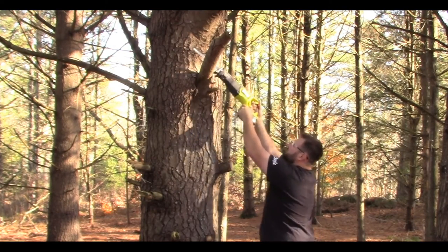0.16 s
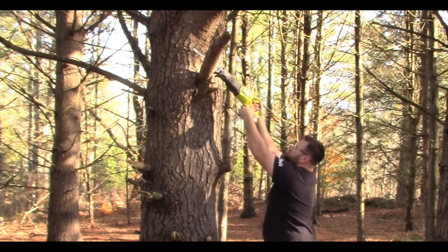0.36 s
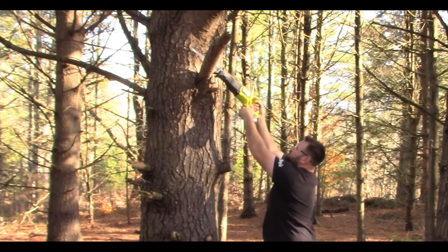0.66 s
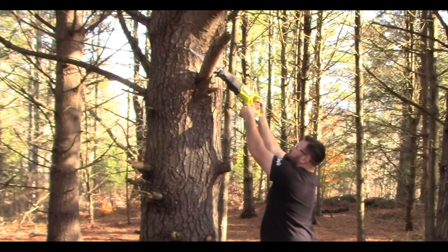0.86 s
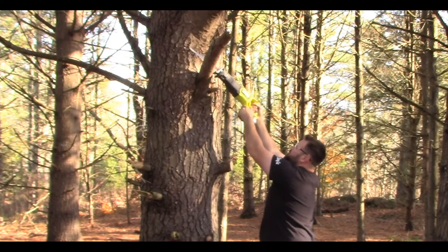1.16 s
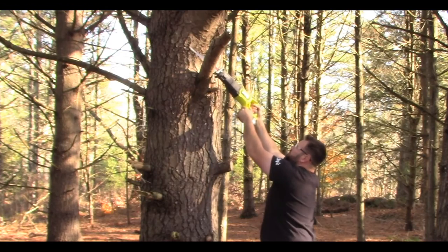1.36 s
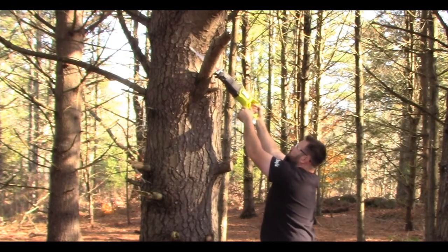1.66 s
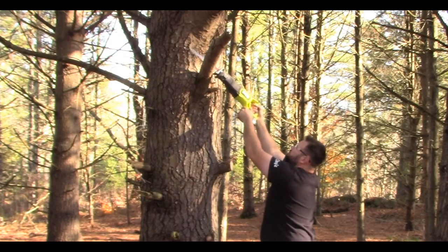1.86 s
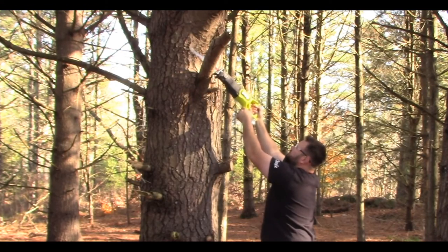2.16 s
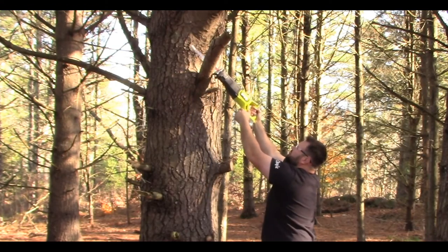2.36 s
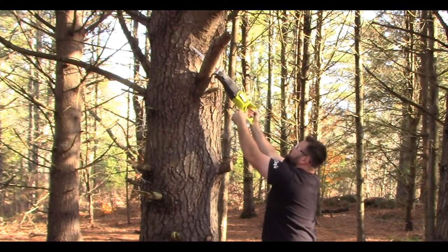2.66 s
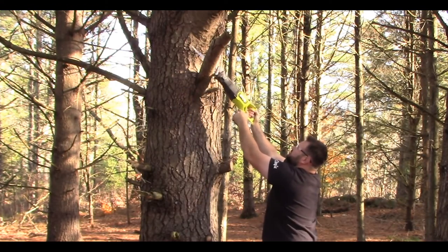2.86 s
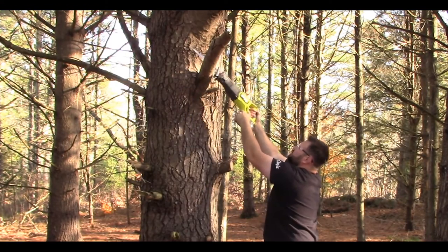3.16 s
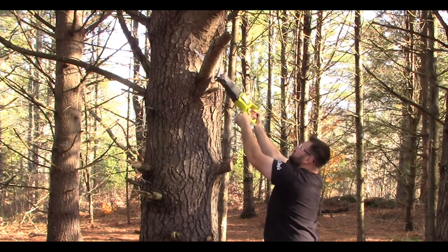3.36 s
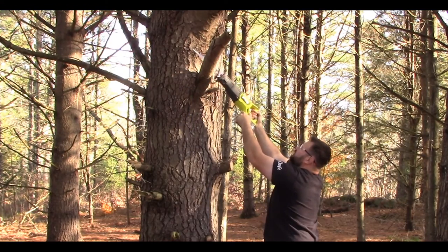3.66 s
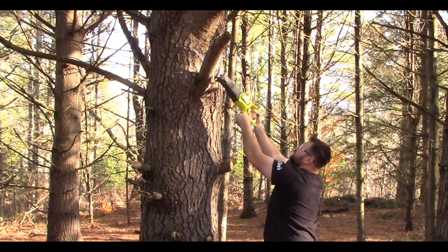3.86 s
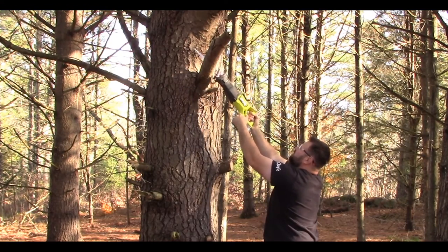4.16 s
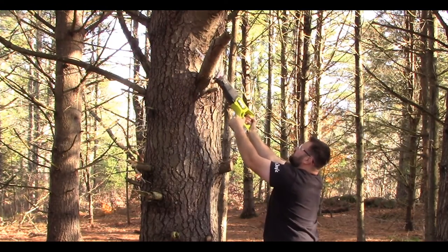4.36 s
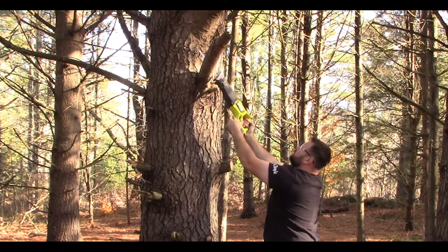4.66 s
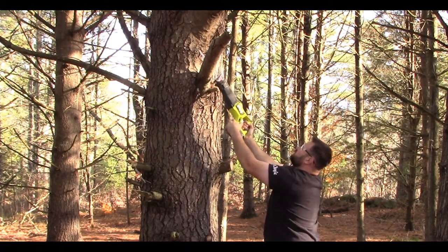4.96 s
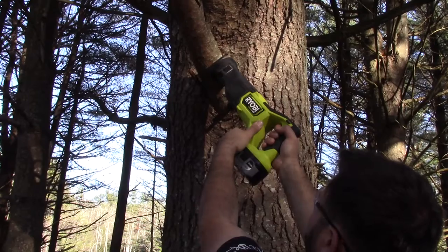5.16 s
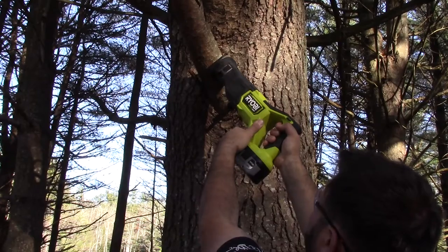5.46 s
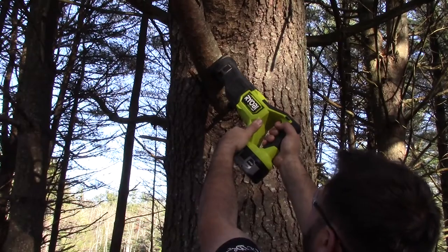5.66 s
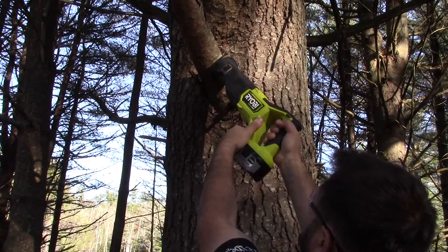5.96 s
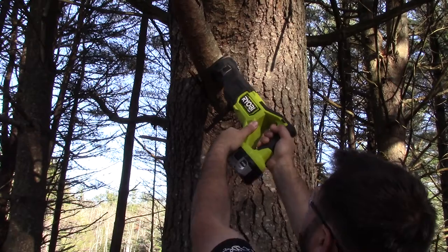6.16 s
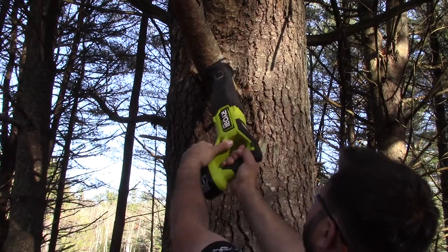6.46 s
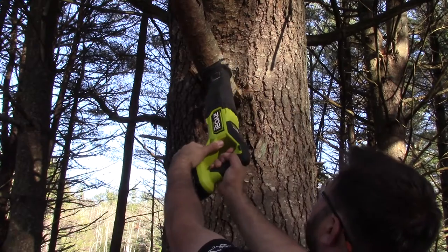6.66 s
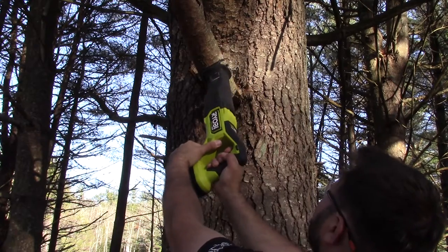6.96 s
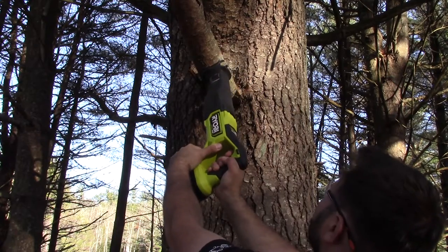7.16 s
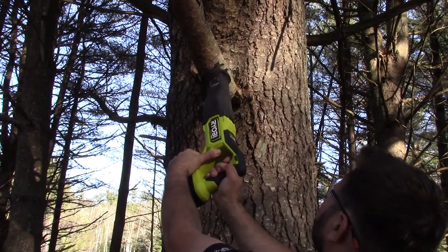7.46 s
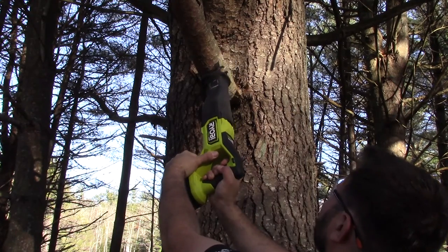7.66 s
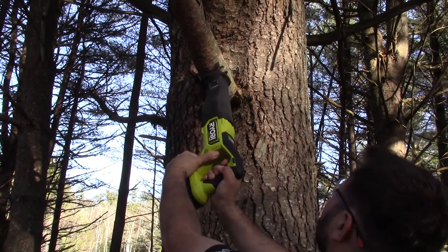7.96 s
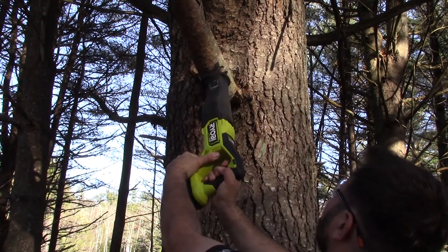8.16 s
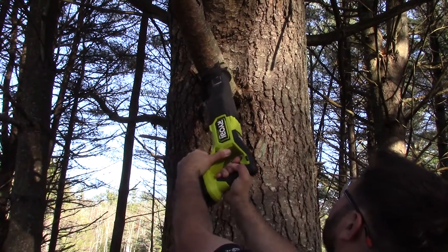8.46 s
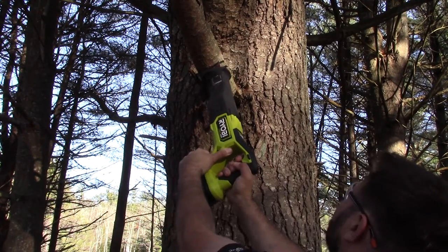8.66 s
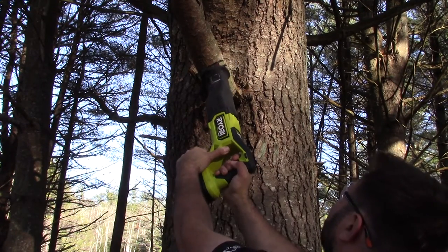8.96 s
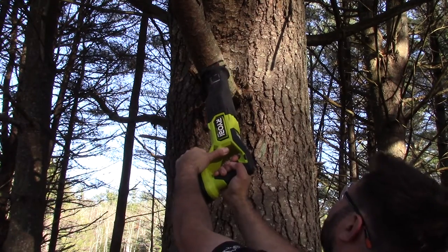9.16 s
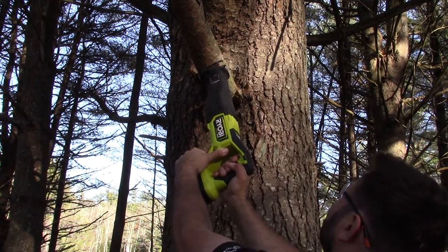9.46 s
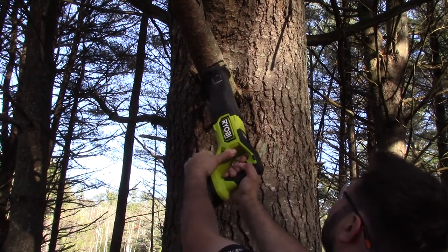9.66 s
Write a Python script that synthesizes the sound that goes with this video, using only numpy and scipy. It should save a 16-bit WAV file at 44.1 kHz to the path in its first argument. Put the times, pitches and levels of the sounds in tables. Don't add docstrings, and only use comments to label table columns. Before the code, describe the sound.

From 0 to 0.45 s there is only soft, still woodland air and the low, faint hum of a far engine. At about 0.46 s a battery reciprocating saw is triggered: a thin electric whirr climbs for a quarter second, and by 0.7 s the teeth bite. A loud, hard, fast rattle follows, over forty strokes a second, knocking and ringing in the housing, with a gear whine and bright dry rasp of torn wood fibres. The pitch lifts slightly toward 2.6 s, then sags near 2.8-3 s as the blade is pushed harder. The first part is heard from farther off; at 5.05 s it cuts suddenly to a close perspective. Around 6.3 s the saw leans in and labours lower, its tone shifting again near 7.35 and 8.4 s with small pitch wavers. It keeps sawing to the end, outdoors with only short trunk reflections.

```python
import sys
import numpy as np
from scipy import signal
from scipy.io import wavfile
from scipy.ndimage import uniform_filter1d, minimum_filter1d

SR = 44100
rng = np.random.default_rng(int(sys.argv[2]) if len(sys.argv) > 2 else 0)


def amplitude_ratio(level_db):
    exponent = np.asarray(level_db, float) / 20
    return 10 ** exponent


def to_wav(s):
    ch = np.atleast_2d(s).T
    pcm = np.round(np.clip(ch, -1, 1) * 32767)
    wavfile.write(sys.argv[1], SR, pcm.astype(np.int16))


N = 432180
t = np.arange(N) / SR

PINION, WHEEL = 6, 44
TRIGGER_S, SPIN_S = .462, .26
BITE_S, BITE_SPAN_S = 0.676, 0.064

# start_s (middle of the turn), span_s
RASP_TURNS = [
    (2.3, 0.36),
    (2.82, 0.31),
    (4.2, 0.44),
    (5.045, .01),
    (6.3, 0.24),
    (7.35, 0.46),
    (8.4, 0.22),
]
# housing_db, rasp_db, whine_gain_db, handle_shake_db
STANCE = [(-15.5, -30.5, -0.5, -31.5), (-15.5, -31, -1, -37), (-13.8, -30, -0.5, -34),
          (-13.5, -29, 0.3, -42), (-11.5, -31, 0.8, -30), (-13.5, -30.5, -7.5, -34), (-14, -29, 0.1, -33),
          (-12.5, -29.5, -4.5, -34)]
# knock_db (against the housing), rattle_lock (0-1), clamp_tick_share,
# trunk_echo_ms
PLAY = [(-7, 0.83, .22, 1.29), (-9, 0.49, .22, 1.21), (-4, .82, 0.34, 1.24), (-3, 0.73, 0.51, 1.28),
        (-4, 0.85, .25, 0.97), (-4.5, 0.81, 0.42, 0.844), (-5.5, 0.83, .5, 0.895), (-3.8, 0.78, 0.48, .8)]


def housing(stroke, still):
    # pitch_hz, width_hz, level_db
    knock_modes = [(1490, 230, 0), (1690, 200, -6), (660, 130, -19)]
    # pitch_hz, level_db (per Hz)
    shell_start = [(30, -56), (60, -20), (110, -25.5), (200, -25), (290, -24), (430, -10), (520, -9),
                   (660, -8), (880, -4), (1150, -4), (1450, -3.5), (1680, 5), (1900, -15), (2200, -14.5),
                   (2600, -27), (3600, -96)]
    shell_push = [(30, -42), (60, -19), (110, -32.5), (200, -25.5), (290, -22), (430, -5.5), (520, -10),
                  (660, -6.5), (880, -6.5), (1150, -7), (1450, -0.5), (1680, 4.5), (1900, -25.5),
                  (2200, -15), (2600, -23), (3600, -62)]
    shell_near = [(30, -62), (60, -21), (110, -29), (200, -28.5), (290, -28.5), (430, -5), (520, -14),
                  (660, -4.5), (880, -12), (1150, -8.5), (1450, 2), (1680, 2), (1900, -28), (2200, -14),
                  (2600, -24), (3600, -74)]
    shell_deep = [(30, -68), (60, -25), (110, -26), (200, -27.5), (290, -26.5), (430, -8), (520, -14.5),
                  (660, -2.5), (880, -5.5), (1150, -5.5), (1450, 3), (1680, 1), (1900, -30), (2200, -13.5),
                  (2600, -17), (3600, -43)]
    shell_last = [(30, -59), (60, -28), (110, -29.5), (200, -28.5), (290, -29), (430, -8.5), (520, -16.5),
                  (660, -8), (880, -10), (1150, -4), (1450, -6), (1680, 4), (1900, -21), (2200, -18),
                  (2600, -18.5), (3600, -77)]
    # start_s (middle of the turn), span_s
    hold_turns = [
        (2.8, 0.25),
        (5.045, .01),
        (6.3, 0.32),
        (8.4, 0.18),
    ]

    knock = amplitude_ratio(np.minimum(stance(PLAY, column=0), -1) - 14 * still)
    lock = np.clip(stance(PLAY, column=1), 0, 1)
    hits = blows(stroke, slack_s=.00018, spread_db=2.3)

    ring_s = t[:1500]
    case = np.zeros(1500)
    for hz, width_hz, db in knock_modes:
        case += amplitude_ratio(db) * np.exp(-np.pi * width_hz * ring_s) * np.sin(2 * np.pi * hz * ring_s)
    case *= 1 - np.exp(-ring_s / 0.002)
    case = lowpass(case, 1800)
    knocks = evened(signal.oaconvolve(hits, case)[:N])

    shudder = fading(hits, 0.0014)
    throb_db = 2.4 * np.cos(2 * np.pi * (2 * stroke - .55)) + 1.2 * np.cos(2 * np.pi * (stroke - .25))
    throb = amplitude_ratio(throb_db)
    loose = evened(rng.standard_normal(N) * (1 + 0.28 * evened(shudder)) * throb)
    drive = .33 * lock * locked_rattle(stroke, throb) + np.sqrt(1 - lock ** 2) * loose
    shell = facing(drive, [shell_start, shell_push, shell_near, shell_deep, shell_last], hold_turns)

    slow = np.minimum(2 * still, .8)
    shell = 1.9 * slow * bandpass(loose, 3, (380, 1900)) + (1 - slow) * shell
    level_db = stance(STANCE, column=0) - 26 * still + 1.06 + .5 * drift(hz=2.5)
    return amplitude_ratio(level_db) * (knock * knocks + np.sqrt(1 - knock ** 2) * evened(shell))


def blows(stroke, slack_s, spread_db):
    knock_places = [(.22, 4.2), (.7, 0)]
    out = np.zeros(N)
    for place, db in knock_places:
        at = np.flatnonzero(np.diff(np.floor(stroke - place)))
        late, size = np.clip(rng.standard_normal((600, 2))[:len(at)].T, -2, 1.6)
        at = np.clip(at + (late * slack_s * SR).astype(int), 0, N - 1)
        out[at] += amplitude_ratio(db + spread_db * size)
    return out


def locked_rattle(stroke, throb):
    step = 6
    coarse, coarse_throb = stroke[::step], throb[::step]
    grip = ramp(2.9, .3)[::step]
    out = np.zeros(len(coarse))
    for k in range(2, 60):
        limb_db = grip * (6.5 * (k in (15, 17)) - 2 * (k in (14, 16)))
        limb_db = limb_db + 2 * (2 < k < 9) + 2 * (12 < k < 22)
        swell_db = 1.9 * drift(.8, step) - .2 * k
        out += tone(k * coarse, limb_db + swell_db) * (coarse_throb if k > 23 else 1)
    return evened(signal.resample_poly(out, step, 1)[:N])


def rasp(rotor, stroke, still):
    # pitch_hz, level_db (per Hz)
    rasp_start = [(1590, -20), (2700, -5), (2780, -6), (2950, -15), (3340, -4), (4680, -14), (5070, -10),
                  (7650, -7.5), (9120, -9), (12000, -21.5), (14400, -20), (15600, -34)]
    rasp_lift = [(1590, -29), (2700, -5), (2950, -8), (3760, -2.5), (4510, -12), (5460, -6), (6560, -6),
                 (8410, -2.5), (10300, -13), (11400, -11), (13700, -15), (15600, -25)]
    rasp_bite = [(1590, -40), (2700, -3.5), (3700, 1.5), (4070, -4.5), (4280, -9), (4750, 0), (6600, -4),
                 (8540, -0.5), (10600, -10.5), (11900, -6), (13300, -10), (15600, -21)]
    rasp_push = [(1590, -38), (2700, -5), (3150, -4), (3360, -7), (3650, -0.5), (4190, -4.5), (4680, -4.5),
                 (6090, -4.5), (7320, 0), (8290, -10), (11000, -10.5), (15600, -23)]
    rasp_near = [(1590, -34), (2700, -7), (3780, 2.5), (4190, -6), (4710, -8.5), (5030, -9), (5380, -5),
                 (6090, -5), (6320, -9), (7160, -7.5), (7590, -8), (11300, -13), (12300, -12), (14400, -14),
                 (15600, -26)]
    rasp_lean = [(1590, -38), (2700, -6), (3700, -0.5), (4350, -5), (4610, -5), (5500, -4), (6370, -11),
                 (6950, -10), (7760, -12.5), (9460, -10.5), (11800, -8.5), (14200, -14), (15600, -29)]
    rasp_deep = [(1590, -29), (2700, -5), (3040, -9), (3810, 0), (4350, -8), (4510, -4.5), (5300, -1),
                 (6370, -10), (6850, -7), (8730, -9), (11400, -9), (12000, -7.5), (15600, -26)]
    rasp_last = [(1590, -27), (2700, -1.5), (3130, -3.5), (3390, -1), (4250, -4), (4710, -1.5),
                 (5870, -3.5), (7320, -4.5), (7590, -4.5), (9180, -9), (11900, -7), (13800, -10),
                 (15600, -28)]
    # order, far_db, near_db (against the rasp)
    orders_up = [(12, -29, -30), (16, -20, -18), (18, -25, -20), (20, -24, -24), (24, -20.5, -23),
                 (28, -29, -30), (32, -27, -21), (40, -24, -14)]

    pull_db = 1.4 * np.cos(2 * np.pi * (2 * stroke - .5)) + 1.54 * np.cos(2 * np.pi * (stroke - .7))
    tearing = rng.standard_normal(N)
    snap_now = rng.random(N) < 1500 / SR
    snaps = amplitude_ratio(3.2 * np.minimum(rng.exponential(1, N), 4)) * snap_now * rng.standard_normal(N)
    fibres = amplitude_ratio(pull_db + 0.22 * drift(hz=58.7)) * (tearing + 0.61 * evened(snaps))

    ticks = fading(blows(stroke, slack_s=.0005, spread_db=3.5), .0012) * rng.standard_normal(N)
    ticks = 0.4 * ticks + bandpass(ticks, 2, (10000, 12500))
    drive = trunk(fibres + stance(PLAY, column=2) * evened(ticks))
    drive = drive + orders(rotor, stroke, orders_up, 9 * np.minimum(3 * still, 1))

    colours = [rasp_start, rasp_lift, rasp_bite, rasp_push, rasp_near, rasp_lean, rasp_deep, rasp_last]
    level_db = stance(STANCE, column=1) - 27 * still + .5 * drift(hz=2.5)
    return amplitude_ratio(level_db) * facing(drive, colours, RASP_TURNS)


def trunk(x):
    delay_s = stance(PLAY, column=3) / 1000
    first, second = np.interp(t - delay_s, t, x), np.interp(t - 1.63 * delay_s, t, x)
    return evened(x + .22 * first + .17 * second)


def whine(rotor, stroke, hz):
    # pitch_hz, level_db
    mesh_case = [(370, -28), (1725, -13), (1795, -20.5), (1822, -31), (1845, -28), (1870, -24.5),
                 (1965, -33), (2075, -48)]
    whine_case = [(500, -48), (1900, -37), (2300, -34), (2350, -30), (2430, -23), (2500, -24),
                  (2620, -31.5), (2770, -47)]
    # offset_strokes, under_mesh_db, under_whine_db
    sidebands = [(-4, -11, -30), (-2, -4, -20), (-1, -9, -22), (1, -26, -20), (2, -22, -15)]
    # order, far_db, near_db
    orders_low = [(2, -37, -35), (3, -42, -43), (4, -37, -36)]
    # start_s, level_db
    spin_up = [(.47, -26), (.53, -9), (.6, -1), (.66, 1), (.7, -5), (.78, 0)]

    idle = 1 - ramp(BITE_S, BITE_SPAN_S)
    whine_db = np.interp((PINION + 2) * hz, *np.transpose(whine_case)) - 11 * idle + stance(STANCE, column=2)
    mesh_db = np.interp(PINION * hz, *np.transpose(mesh_case)) - 25 * (idle + 1 - ramp(TRIGGER_S, 0.078))
    shake_db = stance(STANCE, column=3) - 40 * (1 - ramp(TRIGGER_S, 1.34 * SPIN_S))
    out = tone(stroke, shake_db)
    for off, under_mesh_db, under_whine_db in [(0, 0.004, 0)] + sidebands:
        waver_db = .5 if off == 0 else 2.5
        side = round(off) * stroke
        out += tone(PINION * rotor + side, mesh_db + under_mesh_db + waver_db * drift(hz=6))
        out += tone((PINION + 2) * rotor + side, whine_db + under_whine_db + waver_db * drift(hz=6.5))
    return out + orders(rotor, stroke, orders_low, 4 * curve(spin_up, column=1) + 4 * idle)


def orders(rotor, stroke, rows, db):
    load_db = np.cos(2 * np.pi * (2 * stroke - .5)) + 0.56 * np.cos(2 * np.pi * (stroke - .7))
    out = np.zeros(N)
    for k, far_db, near_db in rows:
        view_db = np.where(t < 5.045, far_db, near_db)
        unsteady = rotor + .0036 * drift(hz=89.9)
        out += tone(round(k) * unsteady, db + view_db + load_db + 1.9 * drift(hz=1.2))
    return out


def chopper(rotor):
    # start_s, level_db
    chop_level = [(.46, -80), (.48, -62), (.55, -56), (.61, -63), (.68, -56), (.72, -80)]
    carrier, db = 9870 * t, curve(chop_level, column=1)
    split = 2 * 2 * rotor
    return tone(carrier + split, db) + tone(carrier - split, db + 4.0) + tone(carrier + 2 * split, db - 4)


def woodland():
    # pitch_hz, level_db (per Hz)
    air_colour = [(12, -34), (20, 0), (49, -9), (85, -1), (112, -12), (191, -21), (239, -16), (769, -12.5),
                  (1460, -21), (10800, -26), (15600, -29)]
    # pitch_hz, level_db
    engine_hum = [(80.7, -57)]
    air_db = -55 + 1.5 + 1.2 * drift(hz=4.2)
    out = amplitude_ratio(air_db) * coloured(rng.standard_normal(N), air_colour)
    for hz, db in engine_hum:
        out += tone(hz * t, db + .6 * drift(hz=3))
    return out


def evened(x):
    return x / np.sqrt(np.mean(x ** 2) + 1e-20)


def ramp(start_s, span_s):
    return np.clip((t - start_s) / span_s, 0, 1)


def curve(rows, column):
    return np.interp(t, [r[0] for r in rows], [r[column] for r in rows])


def drift(hz, step=1):
    knots = np.arange(0, N / SR + 1, .25 / hz)
    values = evened(uniform_filter1d(rng.standard_normal(len(knots)), size=3))
    return np.interp(t[::step], knots, values)


def tone(turns, db):
    return np.sqrt(2) * amplitude_ratio(db) * np.cos(2 * np.pi * (turns + rng.random()))


def fading(x, decay_s):
    return signal.lfilter([1], [1, -np.exp(-1 / (decay_s * SR))], x)


def lowpass(x, hz):
    return signal.sosfilt(signal.butter(4, hz, fs=SR, output="sos"), x)


def bandpass(x, order, band_hz):
    return signal.sosfilt(signal.butter(order, band_hz, "band", fs=SR, output="sos"), x)


def coloured(x, points):
    f, db = np.transpose(points)
    hz = abs(np.fft.fftfreq(8192, 1 / SR))
    log_gain = np.log(amplitude_ratio(np.interp(np.log(hz + 1), np.log(f + 1), db, left=-70, right=-70)))
    taps = np.fft.ifft(np.exp(np.conj(signal.hilbert(log_gain)))).real[:4096]
    return signal.oaconvolve(x, taps / np.linalg.norm(taps))[:N]


def shares(turns):
    past = [np.clip((t - s) / max(span, .002) + .5, 0, 1) for s, span in turns]
    past = [np.ones(N)] + past + [np.zeros(N)]
    return [a - b for a, b in zip(past, past[1:])]


def stance(rows, column):
    return sum(w * row[column] for w, row in zip(shares(RASP_TURNS), rows))


def facing(x, colours, turns):
    out = np.zeros(N)
    for w, colour in zip(shares(turns), colours):
        at = np.flatnonzero(w > 0)
        a, b = max(at[0] - 4096, 0), at[-1] + 1
        out[a:b] += w[a:b] * coloured(x[a:b], colour)[:b - a]
    return out


def scene():
    # start_s, rotor_hz (turns a second)
    speed = [(1.22, 328), (1.7, 309.5), (2.28, 323), (2.6, 350), (3.04, 291.5), (3.3, 298), (3.95, 307),
             (5.04, 302.3), (5.82, 298.5), (6.1, 301.5), (6.42, 286), (6.98, 301), (7.68, 288.5),
             (8.1, 293.5), (8.32, 289.5), (8.6, 300.5), (9.42, 295.5), (9.72, 286)]
    spin = ramp(TRIGGER_S, SPIN_S)
    still = 1 - spin
    inertia_s = .14
    hz = uniform_filter1d(curve(speed, column=1), int(inertia_s * SR)) * uniform_filter1d(spin, size=2000)
    rotor = np.cumsum(hz) / SR
    stroke = rotor * PINION / WHEEL
    saw = housing(stroke, still) + rasp(rotor, stroke, still) + whine(rotor, stroke, hz) + chopper(rotor)
    return (ramp(TRIGGER_S, 0.016) * saw + woodland())[None]


def roll_off(x):
    return signal.sosfilt(signal.butter(12, 15720, fs=SR, output="sos"), x)


def record(dry):
    ceiling, hold = .92, 129
    gain = minimum_filter1d(np.minimum(1, ceiling / (abs(dry) + 1e-9)), hold)
    mix = dry * uniform_filter1d(gain, hold)
    return roll_off(mix)


dry = scene()
out = record(dry)
to_wav(out)
```